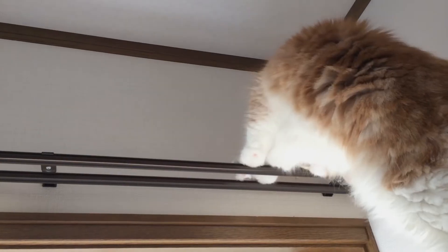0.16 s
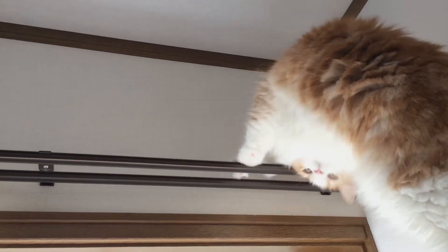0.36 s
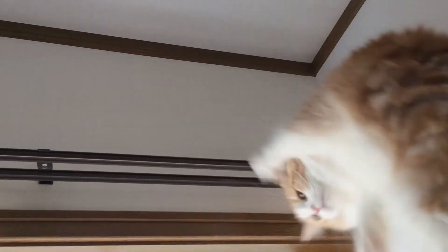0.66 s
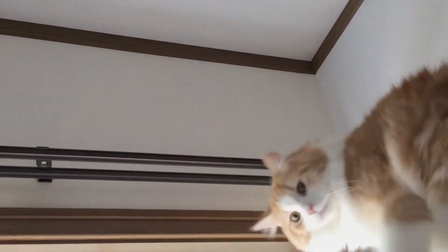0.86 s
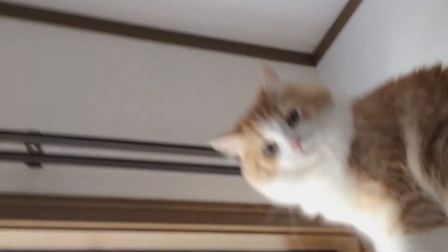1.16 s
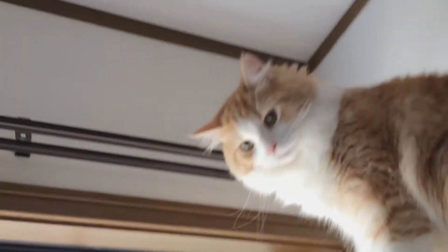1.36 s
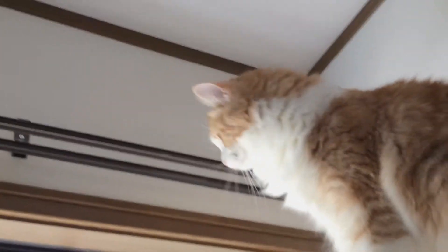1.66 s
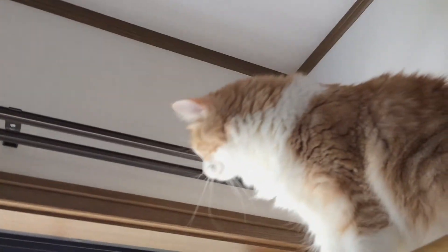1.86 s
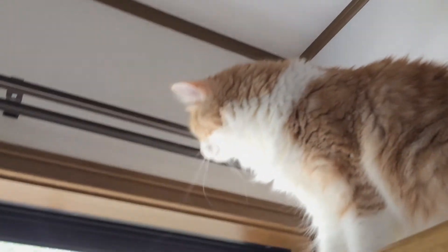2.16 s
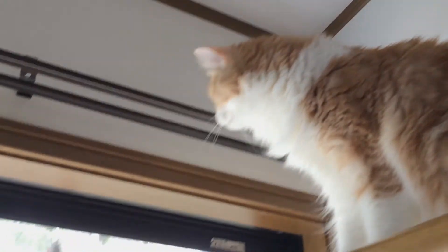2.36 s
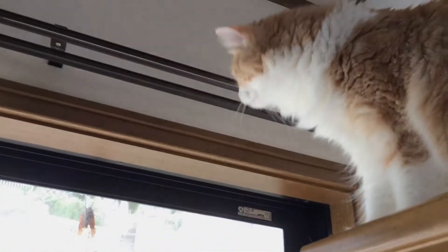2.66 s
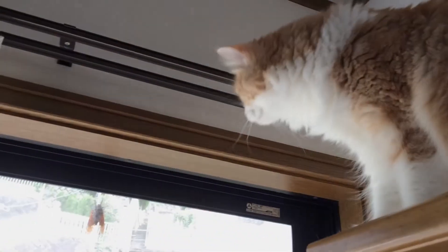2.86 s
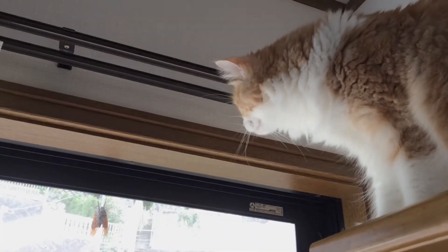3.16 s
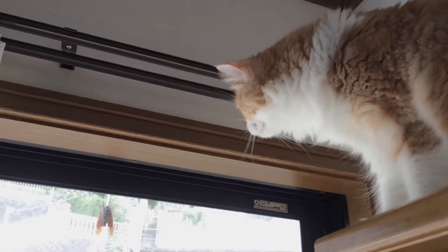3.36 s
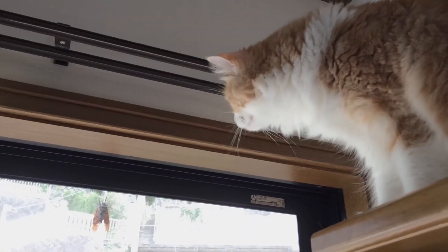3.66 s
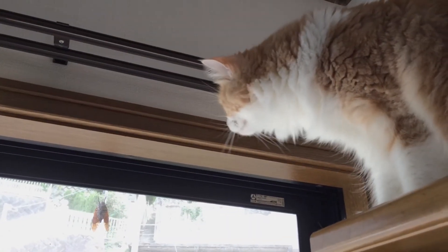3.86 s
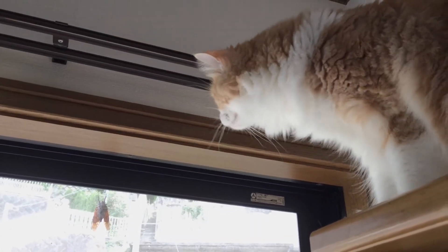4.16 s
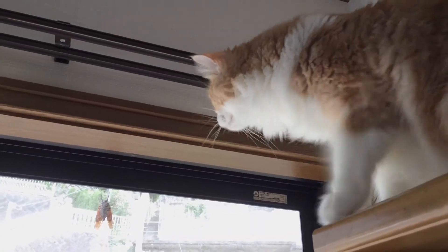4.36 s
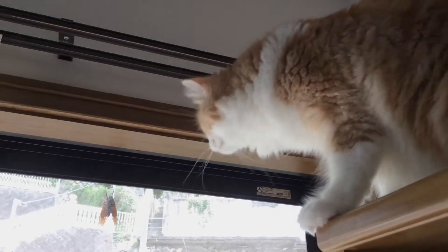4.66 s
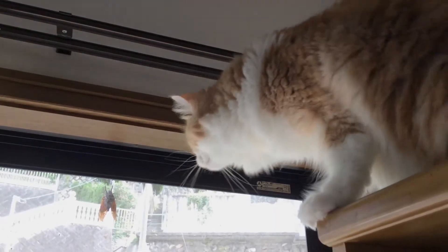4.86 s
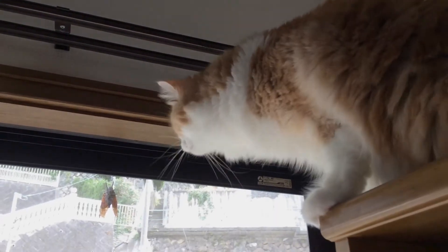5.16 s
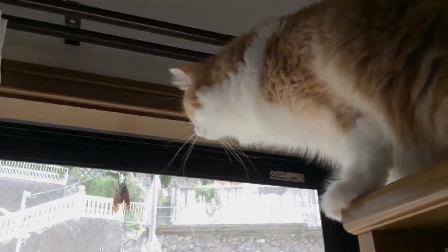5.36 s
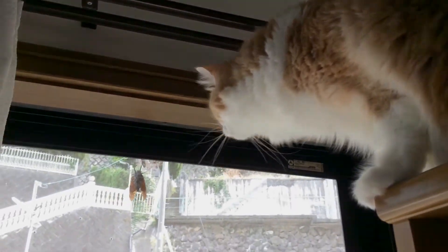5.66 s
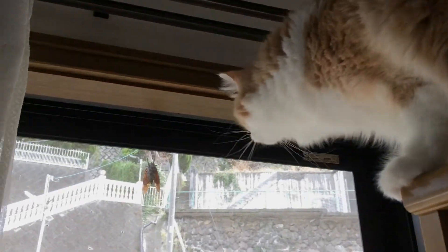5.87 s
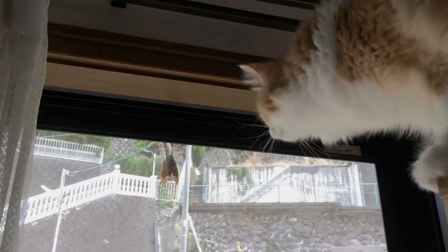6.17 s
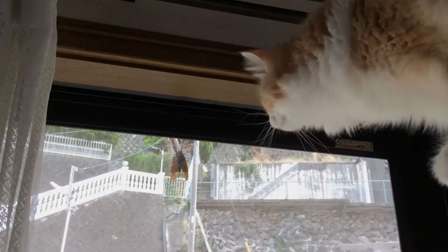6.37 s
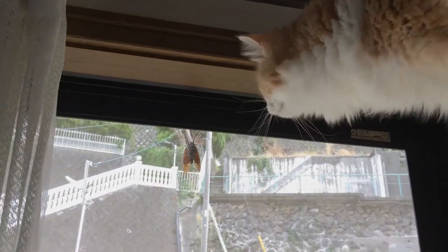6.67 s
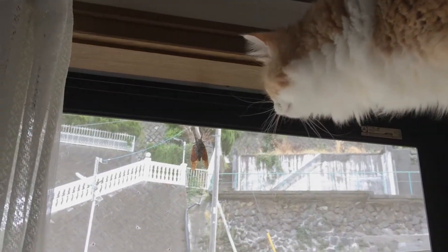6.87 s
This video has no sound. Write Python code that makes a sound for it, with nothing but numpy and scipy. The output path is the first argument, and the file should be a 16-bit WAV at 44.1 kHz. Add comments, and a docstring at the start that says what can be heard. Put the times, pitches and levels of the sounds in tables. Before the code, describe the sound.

One piercing, steady cicada song, a rapid dry rattle with a fluttering high whistle, fills a home interior over faint rumble and soft low thumps.

```python
"""A loud, raspy cicada buzz fills the ears from the start: the insect clings to a window, close to a phone in a small room.
Its two tymbals buckle in turn, rib by rib, and each click rings on in the window recess; a clean body ring pulses on top.
Thin steady whines sit in the buzz, which changes colour as the phone moves closer.
Faint room noise, a low rumble and a hiss made of filtered noise, lies beneath.
A few soft low thumps, short sums of dying sines with a scuff of noise, sound over it."""
import sys
import numpy as np
from scipy.fft import rfft, irfft, next_fast_len
from scipy.io import wavfile
from scipy.ndimage import uniform_filter1d, minimum_filter1d

SR = 44100
rng = np.random.default_rng(int(sys.argv[2]) if len(sys.argv) > 2 else 0)


def wrap_up_sound(samples):
    """Save the sound to the file named by the first command line argument, as 16-bit audio."""
    columns = np.atleast_2d(samples).T
    # keep every value between -1 and 1, then stretch to whole-number steps
    tamed = np.clip(columns, -1, 1)
    steps = np.round(tamed * 32767).astype(np.int16)
    wavfile.write(sys.argv[1], SR, steps)


N = 310023
TIME = np.arange(N) / SR

# In every table and setting a width is the standard deviation of a bell-shaped bump.

# how fast the pattern of tymbal clicks repeats: (time [s], rate [cycles/s])
CLICK_CYCLES = [(0, 15.61), (1.2, 15.645), (2.8, 15.68), (3.5, 15.83), (7, 15.85)]
# pulsing of the body: (time [s], rate [strokes/s])
BODY_STROKES = [(0, 31.54), (.8, 32.3), (2.6, 32.49), (3.6, 31.62), (5.6, 32.24), (7, 32.06)]
# overall colour of the song: (frequency [Hz], left [dB], right [dB])
SONG_COLOUR = [(2050.0, -40.2, -35.8), (2300.0, -24.5, -23.9), (2750.0, -30.5, -31.4),
               (3300.0, -39.7, -28.9), (4100.0, -33.2, -32.2), (4400.0, -20.1, -10.7),
               (4750.0, -10.6, -4.3), (5300.0, -12.1, -8.6), (6800.0, -12.6, -14.9), (7700.0, -9.1, -10.4),
               (8200.0, -4.1, -9.9), (8700.0, -16.4, -15.1), (9350.0, -17.4, -17.3), (10000.0, -8.8, -6.3),
               (11300.0, -6.3, -3.1), (12500.0, -4.0, -0.3), (13000.0, -8.6, -8.4), (13500.0, -8.4, 0.1),
               (14250.0, -12.6, -9.3)]
# resonances and gaps heard from farther back: (centre [Hz], width [Hz], left [dB], right [dB])
FAR_RESONANCES = [(2304, 24, 5.0, 4.1), (2476, 50, -5.2, -5.1), (2606, 24, 2.0, 5.9), (2735, 24, 9.2, 11.0),
                  (2864, 75, -3.0, -3.1), (3122, 24, 4.8, 4.7), (3273, 24, -5.2, -1.8),
                  (3531, 120, -3.3, -1.6), (3811, 75, 5.5, 7.1), (4070, 50, -7.4, -2.8),
                  (4199, 50, 4.9, -14.2), (4371, 34, -6.3, 3.8), (4608, 24, 1.8, 6.1),
                  (5512, 24, -5.4, -2.2), (5922, 24, 2.3, 5.3), (6137, 24, 5.4, 2.9),
                  (6718, 34, -5.9, -3.2), (6826, 34, 1.9, 6.7), (7364, 120, 0.3, -3.2),
                  (7666, 24, 5.2, 3.7), (8010, 24, -6.9, -5.1), (8118, 34, 8.2, -0.4),
                  (8936, 24, -4.5, -5.7), (9044, 24, 5.4, 2.6), (9259, 24, -6.1, -5.4),
                  (9432, 34, 6.0, 4.0), (10271, 50, 4.6, 2.9), (10508, 34, -5.7, -4.1),
                  (10960, 24, -1.8, -6.1), (11240, 24, -0.1, 7.0), (11628, 24, -5.6, -1.3),
                  (11929, 34, 3.3, -5.3), (12123, 34, -4.4, -1.5), (12209, 24, 0.7, -5.8),
                  (12468, 34, 1.0, 6.8), (12769, 24, 0.0, -6.8), (12855, 34, -2.7, 4.3),
                  (13157, 24, 0.7, -6.2), (13264, 24, -0.1, 8.9), (13437, 34, -5.0, 2.1),
                  (13501, 24, -1.3, -6.8), (13738, 24, 0.8, 6.3), (13824, 24, -3.8, -7.0),
                  (13910, 24, 0.8, 7.0), (13997, 34, -3.6, -4.0), (14126, 24, 1.6, 7.4)]
# resonances and gaps heard near the pane: (centre [Hz], width [Hz], left [dB], right [dB])
NEAR_RESONANCES = [(2347, 24, 7.4, 7.2), (2541, 34, -9.6, -9.0), (2756, 50, 5.2, 6.0),
                   (2929, 34, -5.2, -8.4), (3058, 34, 7.3, -0.7), (3295, 24, -4.8, -3.7),
                   (3919, 75, 5.5, 7.1), (4177, 24, -18.2, -16.9), (4328, 50, 5.0, 4.6),
                   (4544, 24, -3.7, -6.5), (4673, 24, -4.1, 5.0), (4780, 24, 5.6, 4.2),
                   (5082, 34, -2.2, -5.7), (5577, 24, 1.2, 6.9), (5857, 24, -3.9, -4.9),
                   (6503, 24, 5.3, 3.8), (6718, 34, -9.1, -6.0), (6891, 75, 3.1, 3.6),
                   (7106, 24, -5.4, -4.6), (7752, 24, -0.6, 6.5), (8032, 24, -7.8, -3.5),
                   (8204, 34, 7.4, 4.5), (8333, 24, -6.0, -2.9), (8398, 24, 4.4, 5.9), (8656, 24, 3.5, 5.0),
                   (9152, 50, 1.9, 4.7), (9819, 34, -4.9, -3.5), (9991, 50, 3.5, 2.9),
                   (10336, 24, 5.4, 4.4), (10573, 75, -2.4, -3.5), (10745, 24, 5.5, 4.7),
                   (10896, 34, 8.8, 7.2), (11047, 50, -5.0, -6.2), (11283, 50, 5.9, 8.4),
                   (11714, 34, 7.3, 11.7), (11972, 250, -1.9, -5.3), (12016, 34, 5.6, 5.7),
                   (12360, 50, -3.4, 4.1), (12597, 34, 9.0, 8.0), (12898, 24, -6.1, -0.4),
                   (13006, 24, 7.4, 1.9), (13415, 24, 5.8, 9.1), (13523, 24, -2.8, -7.6),
                   (13609, 24, 5.5, 3.7), (13910, 34, 4.0, 3.8), (14083, 34, -2.2, -5.1)]
# gaps and weak resonances at the low edge of the buzz, alike at both spots: (centre [Hz], width [Hz], level [dB])
LOW_EDGE_RESONANCES = [(2030, 30, 5), (2170, 28, -8), (2520, 35, -6), (2645, 40, -3), (2900, 45, -6),
                       (3060, 35, 1.5), (3370, 50, -3), (3700, 45, -5), (4060, 55, -5), (4450, 110, -2),
                       (5150, 220, -1.5), (6150, 200, 1)]
# the phone's move toward the pane: (time [s], nearness [0-1])
PHONE_MOVE = [(2.7, 0), (3.9, 1)]
# gain of the band around one sizzling resonance: (time [s], level [dB])
SIZZLE_LEVEL = [(0, 0), (1.2, -2), (2.4, 3), (3.05, -2), (3.7, -0.5), (4.4, -0.5), (5.3, -3.5), (7, 0)]
# bands that swell with the strokes; depth is the swing either way:
# (centre [Hz], width [Hz], depth from afar [dB], depth close by [dB], loudest point [strokes])
BAND_SWELLS = [(2300, 120, 4.5, 3.5, .45), (4700, 300, -0.5, 0.5, 0.31), (5940, 160, -0.3, 2.3, 0.93),
               (6950, 390, 1.7, 2.5, 0.39), (8680, 270, 0.5, 3, 0.92), (11400, 390, 0.7, 1.6, 0.97),
               (12500, 280, 0.4, 2.5, 0.28), (13420, 590, 3, 2, 0.37)]
# phase shift between the microphones from reflections: (frequency [Hz], lead of the left [rad])
PHASE_SKEW = [(2300, -1.1), (2650, -1.5), (3900, -.7), (4400, 1.3), (4670, 2.6), (4850, .8), (5500, 1.2),
              (6000, -2.4), (6300, -.7), (7300, -3.2), (7850, 1.3), (8200, -.6), (8650, 1.6), (10000, 2.7),
              (10300, 0), (11050, 1), (11250, -2), (11700, -1.6), (12150, -3.4), (12550, -1.6),
              (12750, -1.6), (13050, -.3), (13300, -2.3), (13600, -.8), (14100, .9)]
# steady tones that the song sustains; waver and flutter are rms:
# (pitch [Hz], waver [Hz], flutter [dB], left [dB], right [dB])
SUSTAINED_TONES = [(2645, 4, 2.5, -54, -50), (4668, 6.5, 1, -41.5, -34), (4820, 8, 1, -42.5, -38)]
# room noise shared by both microphones: (frequency [Hz], relative level [dB])
AIR_SHARED = [(12, -47), (20, -18), (27, -38), (38, -2.5), (59, 3.5), (90, -6), (118, 0.5), (146, -8.5),
              (206, -7.5), (240, -7.5), (529, -20), (890, -6), (2000, -2.5), (2600, -60), (4400, -120)]
# room noise opposed between the microphones: (frequency [Hz], relative level [dB])
AIR_OPPOSED = [(25, -30), (60, -12), (125, -38), (250, -4.5), (500, 5.5), (900, 4.5), (1900, 2.5),
               (2600, -68), (4400, -120)]
# lean of the room noise to one side: (frequency [Hz], left minus right [dB])
AIR_BALANCE = [(120, -0.5), (450, 2), (1000, -5.5), (1800, -8.5)]
# soft thumps, two flurries and two single ones: (time [s], relative level [dB])
THUMP_HITS = [(1.192, -35), (1.222, -41), (1.254, -40), (1.323, -50), (1.593, -35), (1.625, -41),
              (1.658, -38.5), (1.727, -46.5), (5.457, -37), (5.858, -37)]
# what a thump rings with: (frequency [Hz], average level [dB], time to fall 60 dB [s])
THUMP_MODES = [(61.6, -12, 0.077), (107, 5, 0.046), (192, 4.5, 0.021), (305, -2.5, 0.028)]

# middle pitch of the body's ring from afar and near the pane
RING_FAR_HZ, RING_NEAR_HZ = 8115, 8195
# gain of the song at the start and its very slow fade
SONG_DB, DRIFT_DB_PER_S = -12.5, -0.0047
# the song reaches the left microphone this much later than the right
LEFT_LAG_S = .000612
SIZZLE_HZ, SIZZLE_WIDTH_HZ = 11248, 50
# gain of the hiss and its one slow swell
HISS_DB, SWELL_AT_S, SWELL_WIDTH_S, SWELL_DB = -57, 3.1, 0.54, 4
# the phone holds the loudest peaks to this level, then keeps only what lies below its band limit
CEILING_DB, TOP_HZ = -1.5, 14280


def amp(db):
    """Decibels to gain."""
    return 10 ** (np.asarray(db) / 20)


def unit(x):
    """x at rms 1."""
    return x / np.sqrt(np.mean(x ** 2) + 1e-20)


def curve(rows):
    """(time [s], value) rows as one value per sample."""
    return np.interp(TIME, *np.transpose(rows))


def along(points, hz):
    """Each column of (frequency [Hz], ..) points read on a log axis."""
    f, *cols = np.transpose(points)
    return np.array([np.interp(np.log(hz + 1), np.log(f + 1), c) for c in cols])


def bell(x, centre, width):
    """A smooth bump of height 1."""
    return np.exp(-.5 * ((x - centre) / width) ** 2)


def filtered(x, response):
    """x shaped by a complex response of frequency."""
    size = next_fast_len(N + SR // 2)
    hz = np.fft.rfftfreq(size, 1 / SR)
    return irfft(rfft(x, size) * response(hz), size)[..., :N]


def noise():
    """Plain white noise for the whole scene."""
    return rng.standard_normal(N)


def clicks(times, sizes):
    """Impulses placed between samples by a windowed sinc."""
    at = times[:, None] * SR
    taps = np.floor(at).astype(int) + np.arange(-7, 9)
    shape = np.sinc(taps - at) * np.cos(np.pi * (taps - at) / 16) ** 2
    return np.bincount(np.clip(taps, 0, N).ravel(), (sizes[:, None] * shape).ravel(), N + 1)[:N]


def tymbals(count, uneven, sway, rib_s, rib_db, jitter_s, scatter_db, rasp):
    """The tymbals click in turn, three ribs at a time, in a rhythm that hurries and drags once in every cycle."""
    cycle = np.cumsum(curve(CLICK_CYCLES)) / SR
    even = np.arange(count) / count
    # sway and unevenness are in steps between clicks
    shift = sway * np.sin(2 * np.pi * even) + uneven * rng.standard_normal(count)
    place = even + shift / count
    positions = np.arange(int(cycle[-1]) + 1)[:, None] + place
    starts = np.interp(positions.ravel(), cycle, TIME, right=-1)
    rib = np.arange(3)
    slip, strength = rng.standard_normal((2, len(starts), len(rib)))
    times = starts[:, None] + rib_s * rib + jitter_s * slip
    sizes = amp(rib_db * rib + scatter_db * strength)
    snaps = clicks(times[times > 0], sizes[times > 0])
    # the membrane crackles briefly with every rib
    crackle = np.sqrt(np.abs(uniform_filter1d(snaps ** 2, size=12))) * noise()
    return unit(snaps) + rasp * unit(crackle)


def tail(t60, channels):
    """Dying noise of energy 1 in each channel, falling 60 dB in t60 seconds."""
    t = np.arange(SR // 2) / SR
    h = rng.standard_normal((channels, len(t))) * amp(-60 * t / t60)
    return h / np.linalg.norm(h, axis=1, keepdims=True)


def lags(hz):
    """The delay between the two microphones, as a phase slope for each."""
    return np.exp(2j * np.pi * hz * LEFT_LAG_S * [[-.5], [.5]])


def recess(song, direct, frame_t60, room_t60, ripple, apart):
    """The direct path and the window frame feed both microphones alike; the walls reach each by its own paths."""
    shared, own = tail(frame_t60, channels=1), tail(room_t60, channels=2)

    def response(hz):
        size = 2 * len(hz) - 2
        paths = (direct + rfft(shared + apart * own, size)) * lags(hz)
        # the many paths spread each click in time and colour it only lightly
        return paths / np.abs(paths) ** (1 - ripple)
    return filtered(song, response)


def levelled(x):
    """x with its broad colour evened out and its fine lines kept."""
    spectrum = rfft(x)
    broad_power = uniform_filter1d(np.abs(spectrum) ** 2, size=280)
    return irfft(spectrum / np.sqrt(np.abs(broad_power) + 1e-9), N)


def cicada():
    """Rib clicks, spread by the window recess and the room, with an even broad colour."""
    ribs = tymbals(count=26, uneven=.05, sway=.1, rib_s=.00081, rib_db=-6,
                   jitter_s=.000011, scatter_db=.3, rasp=.5)
    return levelled(recess(ribs, direct=1.2, frame_t60=0.035, room_t60=0.19, ripple=0.25, apart=2.05))


def heard_at(sound, resonances, comb_delay_s, comb_gain):
    """The colour at one spot from its resonances; a comb of fine peaks about 200 Hz apart runs through the buzz
    and fades in the top treble."""
    def response(hz):
        grid = np.linspace(0, SR / 2, 4096)
        db = along(SONG_COLOUR, grid)
        for centre, width, left, right in resonances:
            db = db + np.outer([left, right], bell(grid, centre, width))
        for centre, width, level in LOW_EDGE_RESONANCES:
            db = db + level * bell(grid, centre, width)
        colour = np.array([np.interp(hz, grid, gain) for gain in amp(db)])
        low_cut = 1 - 1 / (1 + (hz / 1950) ** 16)
        comb = comb_gain / (1 + (hz / 9000) ** 8) * np.exp(-2j * np.pi * hz * comb_delay_s)
        return colour * low_cut * (1 + comb)
    return unit(filtered(sound, response))


def whistle(stroke, ring_hz, point, rise_hz):
    """One clean, slightly rising ring of the body on every stroke, each starting at a new phase."""
    turn = stroke - point + .5
    start = rng.uniform(0, 2 * np.pi, N // 100)[np.floor(turn).astype(int)]
    pitch = ring_hz + rise_hz * (turn % 1 - .5)
    swell = np.sin(np.pi * turn) ** 2
    return unit(swell * np.sin(2 * np.pi * np.cumsum(pitch) / SR + start))


def pumped(song, nearness, ring_db):
    """Bands swell at their own points of every stroke; the body's ring sounds cleanly in a band thinned for it."""
    stroke = np.cumsum(curve(BODY_STROKES)) / SR
    out = song
    for centre, width, far_db, near_db, point in BAND_SWELLS:
        band = filtered(song, lambda hz: bell(hz, centre, width))
        depth_db = far_db + (near_db - far_db) * nearness
        swing_db = depth_db * np.cos(2 * np.pi * (stroke - point))
        out = out + band * (unit(amp(swing_db)) - 1)
    ring_hz = RING_FAR_HZ + (RING_NEAR_HZ - RING_FAR_HZ) * nearness
    out = filtered(out, lambda hz: 1 - .45 * bell(hz, RING_NEAR_HZ, 130))
    ring = filtered(whistle(stroke, ring_hz, point=.95, rise_hz=260), lags)
    # the ring leans to the left
    return out + amp(ring_db + np.array([[2], [-2]])) * ring


def buzz():
    """The song as the phone travels: the colours of two spots cross-fade while one resonance sizzles up and down."""
    nearness = np.clip(curve(PHONE_MOVE), 0, 1)
    sound = cicada()
    far = heard_at(sound, FAR_RESONANCES, comb_delay_s=.004956, comb_gain=.4)
    near = heard_at(sound, NEAR_RESONANCES, comb_delay_s=.0049, comb_gain=.4)
    blend = (1 - nearness) * far + nearness * near
    sizzle = filtered(blend, lambda hz: bell(hz, SIZZLE_HZ, SIZZLE_WIDTH_HZ))
    song = unit(blend + (amp(curve(SIZZLE_LEVEL)) - 1) * sizzle)
    return amp(SONG_DB + DRIFT_DB_PER_S * TIME) * pumped(song, nearness, ring_db=-18.3)


def skewed(song):
    """Reflections turn the phase of the two microphones apart, differently at each frequency."""
    return filtered(song, lambda hz: np.exp(1j * along(PHASE_SKEW, hz) * [[.5], [-.5]]))


def whine(pitch_hz, waver_hz, flutter_db, left_db, right_db):
    """A thin tone that wavers in pitch and swells and fades at random, steered by slow noise."""
    waver = unit(filtered(noise(), lambda hz: bell(hz, 0, 12)))
    swell = unit(filtered(noise(), lambda hz: bell(hz, 0, 5)))
    tone = np.sin(2 * np.pi * np.cumsum(pitch_hz + waver_hz * waver) / SR)
    return amp([[left_db], [right_db]]) * unit(tone * amp(flutter_db * swell))


def air(side_db, rumble_db):
    """Filtered noise, partly shared and partly opposed: a steady low rumble under a faint hiss that swells once."""
    mid = unit(filtered(noise(), lambda hz: amp(along(AIR_SHARED, hz))))
    side = amp(side_db) * unit(filtered(noise(), lambda hz: amp(along(AIR_OPPOSED, hz))))
    pair = np.vstack([mid + side, mid - side])
    pair = filtered(pair, lambda hz: amp(along(AIR_BALANCE, hz) * [[.5], [-.5]]))
    rumble = filtered(pair, lambda hz: bell(hz, 0, 350))
    hiss = pair - rumble
    hiss_db = HISS_DB + SWELL_DB * bell(TIME, SWELL_AT_S, SWELL_WIDTH_S)
    return amp(rumble_db) * rumble + amp(hiss_db) * hiss


def thumps(attack_s, level_db, low_hz, high_hz, scuff_db, scuff_t60, scuff_hz):
    """Dull blows whose few low modes die within a few cycles, each with a faint scuff of contact."""
    thud, touch = np.zeros(N + SR), np.zeros(N + SR)
    t = np.arange(SR // 4) / SR
    attack = 1 - np.exp(-t / attack_s)
    for s, db in THUMP_HITS:
        ring = 0
        for hz, level, t60 in THUMP_MODES:
            # every blow strikes the modes a little differently
            fade = amp(level + rng.normal(0, 1.5) - 60 * t / t60)
            ring = ring + fade * np.sin(2 * np.pi * hz * t)
        start = round(s * SR)
        thud[start:][:len(t)] += amp(db + level_db) * ring * attack
        touch[start:][:len(t)] += amp(db + scuff_db - 60 * t / scuff_t60)
    scuff = touch[:N] * unit(filtered(noise(), lambda hz: bell(hz, scuff_hz, 450)))
    dull = filtered(thud[:N], lambda hz: 1j * hz / (1j * hz + low_hz) / (1 + (hz / high_hz) ** 4))
    return scuff + dull


def scene():
    """The cicada with its sustained tones, room noise and thumps, in two channels."""
    song = skewed(buzz())
    whines = sum(whine(*tone) for tone in SUSTAINED_TONES)
    floor = air(side_db=-0.5, rumble_db=-53.0)
    knocks = thumps(attack_s=0.0015, level_db=2.0, low_hz=40, high_hz=373,
                    scuff_db=-13, scuff_t60=0.1, scuff_hz=1380)
    return song + whines + floor + knocks


def record(dry):
    """The phone turns down briefly for the loudest peaks and keeps nothing above its band limit."""
    peak = np.abs(dry).max(axis=0)
    needed = np.minimum(1, amp(CEILING_DB) / (peak + 1e-9))
    # hold the gain down around each peak, then smooth it twice
    gain = uniform_filter1d(minimum_filter1d(needed, size=81), size=41)
    gain = uniform_filter1d(gain, size=41)
    return filtered(dry * gain, lambda hz: hz < TOP_HZ)


dry = scene()
out = record(dry)
wrap_up_sound(out)
```